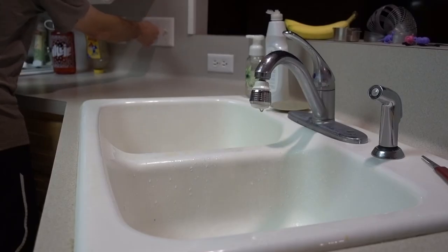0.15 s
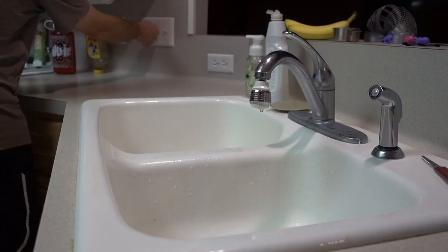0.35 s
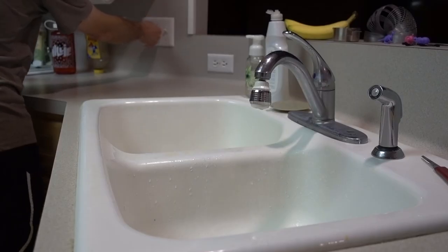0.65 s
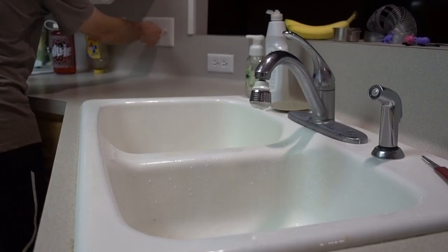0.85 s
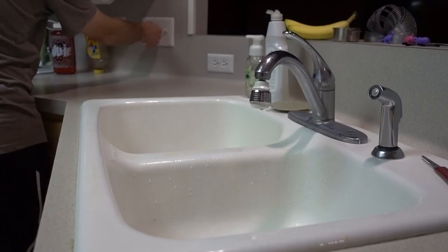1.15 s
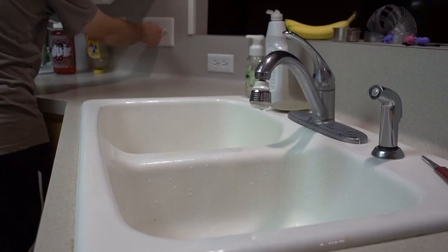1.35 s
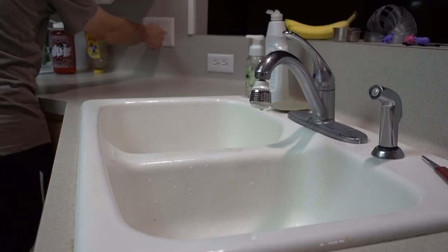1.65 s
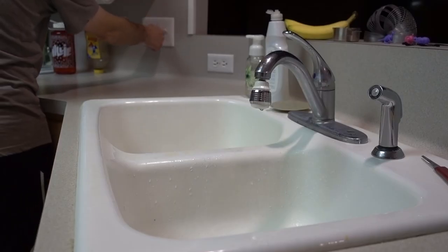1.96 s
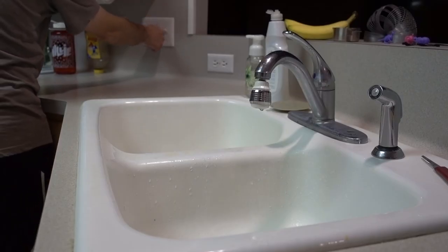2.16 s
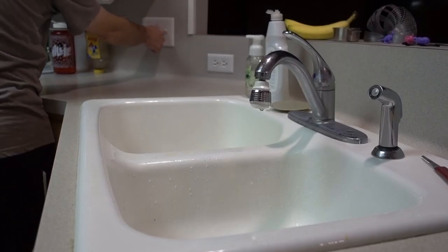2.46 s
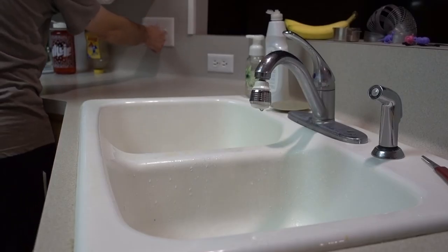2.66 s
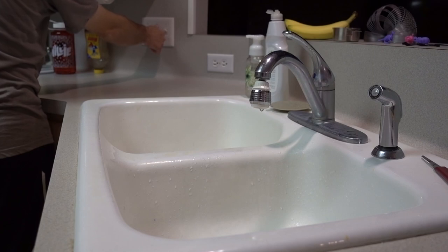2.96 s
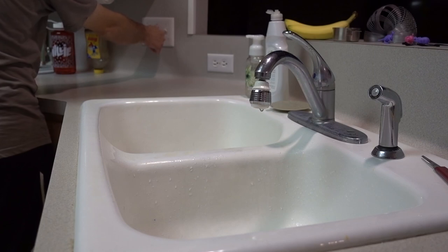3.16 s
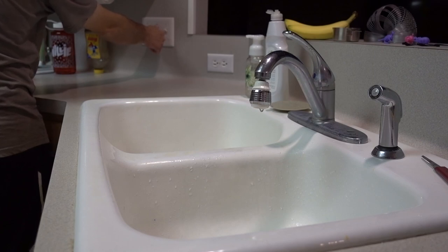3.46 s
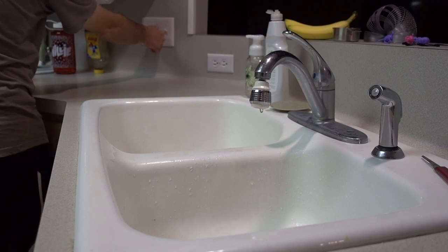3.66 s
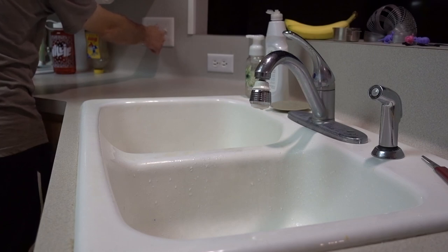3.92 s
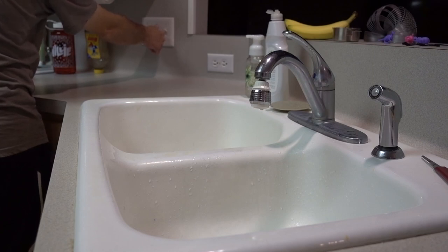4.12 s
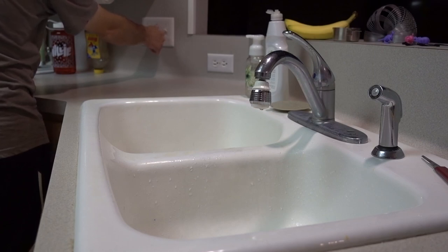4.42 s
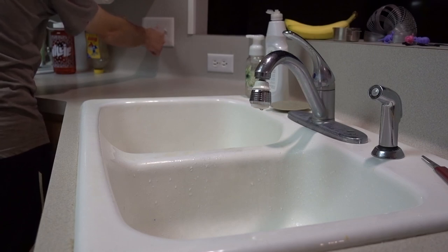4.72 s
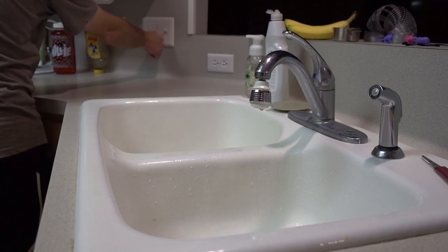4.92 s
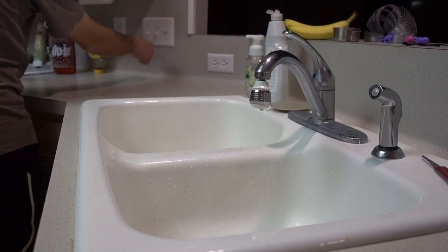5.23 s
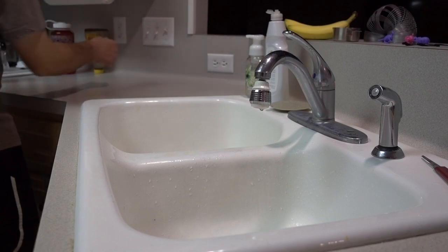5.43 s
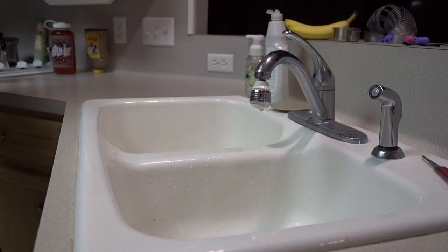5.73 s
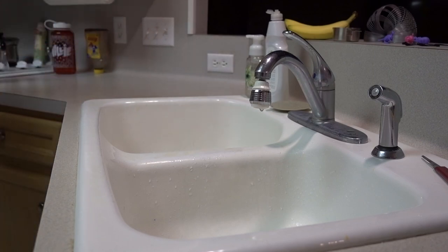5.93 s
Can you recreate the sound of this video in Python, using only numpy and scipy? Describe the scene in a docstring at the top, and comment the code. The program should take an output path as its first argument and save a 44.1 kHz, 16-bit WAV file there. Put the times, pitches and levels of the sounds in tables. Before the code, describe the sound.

Quiet kitchen, switch snap, then an under-sink grinder lurches to life, humming, ringing and spitting water for several seconds before being switched off.

```python
"""First a quiet kitchen, then the click of a wall switch: a waste disposer under the sink starts with a jolt
and a squeal, runs almost empty, and is switched off to coast down. Air and water whirl in the grind chamber,
modelled as noise through resonances that sing through the drain mouth. Loose lugs rattle the steel plate (pulsed
noise through its modes), slugs of water spit at the wall (noise bursts), air pockets gulp (rising tones), and
the motor hums through the cabinet (sines tied to mains and shaft, over low noise)."""
import sys
import numpy as np
from scipy import signal
from scipy.fft import rfft, irfft, next_fast_len
from scipy.io import wavfile
from scipy.ndimage import uniform_filter1d

SR = 44100
rng = np.random.default_rng(int(sys.argv[2]) if len(sys.argv) > 2 else 0)


def wrap_up_sound(samples):
    """Save the sound to the file named by the first command line argument, as 16-bit audio."""
    columns = np.atleast_2d(samples).T
    # keep every value between -1 and 1, then stretch to whole-number steps
    tamed = np.clip(columns, -1, 1)
    steps = np.round(tamed * 32767).astype(np.int16)
    wavfile.write(sys.argv[1], SR, steps)


N = 268304
# frequency bins in Hz, padded so that rings can die
HZ = np.maximum(np.fft.rfftfreq(next_fast_len(N + SR // 2, True) // 2 * 2, 1 / SR), 1)

# Kitchen air: [f/Hz, relative density/dB per Hz]
AIR_COLOUR = [(12, -59), (20, -27), (86, -10), (99, -28), (118, -0.5), (151, -3), (406, -16), (431, -17),
              (477, -10.5), (528, -14), (2500, -29.5), (3250, -75), (5500, -120)]
# Microphone hiss: [f/Hz, relative density/dB per Hz]
HISS_COLOUR = [(1800, -30), (2500, 0), (3700, -7), (5300, -13), (8000, -18), (16000, -22)]
AIR_DB, HISS_DB = -57, -76

# Likeness of the two ears: [f/Hz, left-right likeness 0-1]
EAR_LIKENESS = [(60, .999), (350, .997), (900, .975), (1000, .96), (1100, .89), (2000, .87), (3000, .85),
                (6000, .67), (9500, .42), (13000, .74), (16000, .85)]
# Stereo lean: [f/Hz, left minus right level/dB]
EAR_LEAN = [(500, 0), (900, -.8), (990, -1.4), (1060, -3), (1500, -2.5), (2000, -.5), (3000, .5),
            (6000, 1.1), (10000, .7), (14000, -.2)]
# Bands cancelled by echoes in the basin: [f/Hz, width/Hz, depth 0-1]
BASIN_NOTCHES = [(404.5, 68, 0.76), (653, 38, 0.65), (885, 110, 0.83), (1047, 19, 0.45), (1981, 43, 1),
                 (2517, 180, 1), (3970, 280, 0.7)]
WALLS_T60_S, WALLS_DB = 0.76, -10  # tail level before its bass is cut

# Wall switch snapping over: [t/s, strike level/dB]
SWITCH_SNAPS = [(0.4715, -24.5), (5.1625, -27.5)]
# Ring of the switch and its plate: [f/Hz, level/dB, t60/s]
SWITCH_MODES = [(800, -8, .035), (1400, -1, .04), (1900, -7, .025), (2200, -4, .028), (4700, -12, .012)]

# Motor through the cabinet: [t/s, rumble level/dB, drive of the tones/dB]
MOTOR_LEVELS = [(0.47, -86, -60), (0.5, -42.5, -40), (0.62, -46, -1), (0.8, -53.5, 2), (3, -54, 0.5),
                (5.15, -50.5, -2), (5.25, -51, -5.5), (5.6, -54.5, -8), (6.08, -64, -31)]
# Shaft tones: [multiple of the shaft rate, mean level/dB at 0 dB drive]
SHAFT_ORDERS = [(6, -61.5), (8, -63.5), (10, -54.5), (11, -52.5), (62, -57), (63, -50.5), (64, -58)]
# Shaft speed: [t/s, turns per s]
SHAFT_SPEED = [(0.47, 7), (0.5, 18), (0.62, 27), (0.75, 29.66), (5.16, 29.66), (5.6, 28), (6.08, 24.5)]
# Colour of the cabinet and pipes: [f/Hz, relative density/dB per Hz]
RUMBLE_COLOUR = [(12, -57), (20, -16), (70, -3.5), (129, 1.5), (226, 0), (307, 11), (337, 7.5), (406, -51),
                 (519, -39), (570, 7), (655, -38), (741, -51), (800, 5), (1040, -78), (1760, -120)]
# Magnetic hum at twice the mains: [t/s, level/dB rms of its steady tone]
HUM_LEVELS = [(0.48, -60), (0.62, -52), (0.75, -55.5), (2, -56), (3.5, -55), (5.15, -55.5), (5.2, -75)]
# Starting jolt of the motor in its mount: [t/s, level/dB rms]
JOLT_LEVELS = [(0.48, -74), (0.516, -63), (0.576, -48.5), (0.618, -55), (0.668, -43), (0.766, -73),
               (0.79, -75), (0.85, -68)]
# Resonance of that mount: [f/Hz, width/Hz]
JOLT_MODE = (68, 25)
HUM_HZ, SIDE_TONE_DB = 120, -1  # side tone: one shaft rate above the hum, so that it wavers once a turn
# the shaft's fourth order lags the hum and beats with it
SLIP_BEAT_HZ, IN_STEP_S, FOURTH_ORDER_DB = 1.37, 1.29, -4.5

# Air pockets gulping in the water: [t/s, peak level/dB, nominal f/Hz, t60/s]
GULPS = [(1.2835, -24.5, 1400, 0.1), (1.508, -23.5, 1545, 0.12), (1.9445, -34, 1420, 0.061),
         (2.043, -24, 1293, 0.16), (2.58, -19, 1372, 0.093), (2.807, -17.5, 1500, 0.058),
         (2.8973, -27, 1500, 0.087), (3.7098, -30, 1514, 0.065), (3.916, -18.5, 1394, 0.057),
         (4.0264, -15.5, 1395, 0.052), (4.4507, -31, 1313, 0.13), (4.622, -33, 1510, 0.057),
         (5.4404, -37, 1230, 0.057), (5.655, -34, 1430, 0.074), (6.0442, -36, 1325, 0.12)]

# Slugs of water thrown at the wall: [t/s, bright peak level/dB, body level/dB, top level/dB,
# plate ring level/dB, t60/s]
SPITS = [(0.5102, -36, -45, -44, -49, 0.13), (0.5656, -34, -38.5, -47, -36.5, 0.33),
         (0.6863, -27, -47, -31.5, -33, 0.11), (0.7746, -21, -34, -47, -30.5, 0.073),
         (0.902, -29, -39, -39, -41, 0.079), (0.9323, -29, -58, -51, -42, 0.074),
         (0.9536, -41, -54, -54, -40, 0.077), (1.0036, -44, -41, -50, -35, 0.2),
         (1.0909, -21.5, -33, -34, -36.5, 0.095), (1.191, -39, -40.5, -43, -40, 0.22),
         (1.2615, -30, -37, -30.5, -36.5, 0.14), (1.2994, -39, -43, -39, -46, 0.13),
         (1.491, -32, -41, -40, -28.5, 0.11), (1.579, -33, -50, -40, -30, 0.092),
         (1.6397, -28, -41, -36, -39, 0.088), (1.7379, -34, -43, -53, -47, 0.11),
         (1.8334, -19, -31, -27, -33.5, 0.082), (1.92, -21.5, -35, -46, -38, 0.064),
         (1.948, -22.5, -36, -31, -35, 0.064), (2.032, -38, -37, -48, -40.5, 0.24),
         (2.145, -25.5, -48, -49, -44, 0.31), (2.2548, -30, -37, -41, -50, 0.16),
         (2.369, -28.5, -42, -42, -38, 0.25), (2.4564, -37, -53, -37, -47, 0.069),
         (2.5324, -29, -46, -41, -35, 0.074), (2.581, -30, -41, -45, -38.5, 0.13),
         (2.658, -27, -36, -48, -45.5, 0.1), (2.7132, -29.5, -39.5, -39, -57, 0.25),
         (2.809, -27, -32, -38, -40, 0.062), (2.897, -31, -33.5, -44, -40, 0.12),
         (2.9804, -40, -55, -53, -37.5, 0.1), (3.0455, -45, -49, -43, -46, 0.11),
         (3.1467, -29, -44, -37, -43, 0.1), (3.2046, -40, -37, -53, -51, 0.07),
         (3.267, -47, -39, -53, -41.5, 0.14), (3.3164, -42, -45, -54, -34, 0.047),
         (3.3708, -32, -39, -53, -43, 0.11), (3.4266, -40, -45, -49, -48, 0.33),
         (3.5, -23, -45, -41, -40, 0.1), (3.556, -29, -37.5, -41, -43, 0.13),
         (3.6381, -25, -36, -48, -30, 0.074), (3.717, -18, -35, -30, -39, 0.095),
         (3.7868, -36, -42, -46, -36, 0.054), (3.8422, -32, -42, -53, -39, 0.1),
         (3.919, -28, -37.5, -45, -42, 0.11), (3.9524, -43, -46, -53, -41, 0.1),
         (4.0287, -36, -33, -41, -41, 0.087), (4.0976, -34, -42, -42, -50, 0.16),
         (4.209, -24, -37, -43, -39, 0.095), (4.3695, -32, -39, -58, -37, 0.068),
         (4.546, -46, -47, -55, -37, 0.072), (4.58, -43, -59, -45, -46, 0.079),
         (4.628, -24.5, -34, -32, -40, 0.11), (4.7042, -27, -39, -44, -50, 0.092),
         (4.7381, -35, -43.5, -41, -45.5, 0.26), (4.837, -35, -37.5, -43, -45, 0.11),
         (4.8703, -30, -35.5, -38, -48, 0.085), (4.9167, -19.5, -35.5, -39, -39.5, 0.16),
         (4.9766, -34, -43.5, -48, -65, 0.23), (5.248, -28.5, -45, -45, -48, 0.1),
         (5.387, -40, -44, -45, -46, 0.13), (5.445, -24, -35, -48, -35, 0.082),
         (5.5531, -34, -50, -64, -47.5, 0.17), (5.6044, -39, -46, -57, -57, 0.11),
         (5.655, -33, -44, -50, -41.5, 0.078), (5.6979, -47, -43, -47, -56, 0.11),
         (5.7743, -41, -38, -48, -38, 0.086), (5.8466, -43, -43.5, -46, -58, 0.093),
         (5.9105, -40, -45.5, -61, -55, 0.11), (5.9994, -26.5, -38, -45, -42, 0.08),
         (6.044, -39, -47, -61, -54, 0.088)]
SPIT_RISE_S, BODY_THUMP_DB = 0.0054, 7  # the body part also thumps the chamber
PLATE_OUTLASTS = 1.32  # the plate rings this many times longer than the hiss
LULL_DB, LULL_T60_S = -4.5, 0.23  # thinning while a slug gathers: depth, and how fast it deepens
NOISE_CREST_DB = 9  # peak of a noise burst over its rms

# Whirl between surges: [t/s, drain-mouth tone level/dB, upper resonances level/dB, plate ring level/dB,
# spray level/dB]
WHIRL_LEVELS = [(0.49, -72, -45, -88, -76), (0.66, -41, -41.5, -62, -46), (0.77, -32, -46.5, -51, -44),
                (1.08, -28, -43.5, -50.5, -42), (1.41, -36.5, -42, -50, -50.5),
                (1.64, -37.5, -46, -56, -43.5), (2.01, -35, -45.5, -56.5, -44),
                (2.54, -30.5, -37, -43, -44), (2.81, -29, -48, -51.5, -47.5), (3.2, -31, -39, -41, -46),
                (3.5, -35.5, -57, -55, -45), (3.73, -34.5, -47, -60, -44), (4.01, -31, -46, -57, -45),
                (4.38, -32.5, -44.5, -52, -47), (4.76, -34, -48.5, -52, -45), (4.94, -30, -60, -58, -48),
                (5.15, -43.5, -49.5, -56.5, -49.5), (6.08, -41, -54.5, -69, -54.5)]
# Colour of the spray: [f/Hz, relative density/dB per Hz]
SPRAY_COLOUR = [(1180, -52), (2000, -21), (2140, -20), (2550, -53), (2810, 16), (3980, -11), (5390, 4),
                (6250, -49), (6760, 5.5), (15100, 2), (16000, 10)]
# Steel plate modes: [f/Hz]
PLATE_HZ = [2884, 3300, 3745, 4200, 4316, 4700, 5150, 5634, 5754, 5950, 6132, 6255, 6378, 6955, 7530, 8410]
# Shape of each plate mode: [width/Hz, level/dB]
PLATE_SHAPE = [(193, -9), (197, -14.5), (28, 2.5), (24.4, 1), (25.7, 2.5), (120, -10), (35, -9), (35, -3),
               (34.8, -12), (40, -13), (44.7, 6.5), (40.3, -3.5), (50, 4.5), (40, -7.5), (252, -8.5),
               (208, -10.5)]
PLATE = [(hz, *shape) for hz, shape in zip(PLATE_HZ, PLATE_SHAPE)]

# Start: plate squealing as it breaks free while standing water churns: [t/s, squeal level/dB, churn level/dB]
START_LEVELS = [(0.49, -93, -34), (0.506, -39, -36.5), (0.564, -48.5, -29.5), (0.602, -48, -33.5),
                (0.648, -60, -39), (0.68, -63, -37)]
# Squeal resonances: [f/Hz, width/Hz, level/dB]
SQUEAL_MODES = [(10570, 200, -2), (8900, 64, -2), (8100, 130, -4), (5700, 71, -2), (4640, 110, -19)]
# Churn resonances: [f/Hz, width/Hz, level/dB]
CHURN_MODES = [(491, 38, 4), (603, 26, 6), (774, 110, 5.5), (1147, 120, 12.5), (1420, 510, -2),
               (4600, 390, -10), (8200, 1200, -39)]
# A lug scraping the ring: [t/s, level/dB, t60/s]
SCRAPES = [(2.14, -23, 0.37)]
# Scrape resonances: [f/Hz, width/Hz, level/dB]
SCRAPE_MODES = [(5880, 46, 7.5), (1130, 30, 14.5), (4920, 110, -14)]
SCRAPE_RISE_S = 0.0093

# Lugs knocking against their stops: [t/s, peak level/dB before the knock is coloured and heard in the room]
LUG_KNOCKS = [(0.6853, -36), (0.8015, -20), (0.9807, -40), (1.292, -16), (1.3503, -22), (1.482, -16.5),
              (2.137, -19), (2.4294, -22), (2.8809, -42), (3.1981, -22), (3.3568, -20), (3.5518, -21),
              (3.6361, -18), (3.713, -14.5), (4.201, -20), (4.3655, -22), (4.4515, -13.5), (4.6229, -21),
              (4.8589, -31), (4.913, -26)]
LUG_RISE_S, LUG_T60_S = 0.002, 0.028

# Drain-mouth resonances: [f/Hz, width/Hz, level/dB]
MOUTH_MODES = [(1002, 21.8, 7), (1074, 45.8, -1.5), (1105.7, 24, -1.5), (1199, 2.4, -7), (990, 10, -41)]
# Air and wall resonances of the chamber: [f/Hz]
CHAMBER_HZ = [310, 581, 690, 815, 861, 1290, 1345, 1512, 1750, 1838, 1895, 2014, 2300]
# Shape of each chamber resonance: [width/Hz, level/dB]
CHAMBER_SHAPE = [(37.7, -4), (24.2, -2.5), (37.8, -18.5), (27, -14.5), (27, 4.5), (60, -10), (43, -1.5),
                 (22.8, -1), (52.3, -3), (25, -1), (49.7, 2), (25.3, -1), (50, -16.5)]
CHAMBER = [(hz, *shape) for hz, shape in zip(CHAMBER_HZ, CHAMBER_SHAPE)]
# Water clearing the drain mouth at a stroke, so the tone jumps up: [t/s, nominal peak level/dB, t60/s]
MOUTH_KNOCKS = [(0.5057, -29.5, 0.19), (0.5751, -23, 0.16), (0.595, -18.5, 0.15), (0.6255, -34, 0.15),
                (0.689, -17, 0.15), (0.7382, -21, 0.36), (0.8056, -24, 0.15), (0.8785, -13, 0.1),
                (0.9224, -18, 0.1), (0.952, -19, 0.086), (1.005, -21, 0.16), (1.037, -21, 0.24),
                (1.095, -27, 0.19), (1.1303, -32, 0.12), (1.204, -24.5, 0.35), (1.259, -20.5, 0.19),
                (1.3483, -13.5, 0.11), (1.493, -14.5, 0.2), (1.5315, -19, 0.33), (1.5893, -17, 0.26),
                (1.694, -26, 0.092), (1.7345, -18.5, 0.081), (1.774, -20.5, 0.094), (1.8986, -20.5, 0.19),
                (1.9445, -24, 0.31), (2.0023, -24, 0.26), (2.03, -23.5, 0.27), (2.1316, -9, 0.078),
                (2.251, -21, 0.15), (2.284, -21.5, 0.13), (2.3456, -24, 0.18), (2.3895, -22.5, 0.34),
                (2.4713, -20.5, 0.26), (2.524, -18, 0.12), (2.5705, -17, 0.17), (2.594, -20, 0.17),
                (2.6285, -20, 0.22), (2.6569, -26, 0.19), (2.6975, -19, 0.15), (2.7244, -24, 0.1),
                (2.803, -17, 0.21), (2.8389, -35, 0.11), (2.8862, -20.5, 0.4), (2.941, -15, 0.15),
                (2.992, -21, 0.16), (3.026, -18.5, 0.34), (3.0464, -38, 0.19), (3.081, -21, 0.26),
                (3.1308, -20, 0.11), (3.241, -15.5, 0.2), (3.2814, -20.5, 0.21), (3.3125, -20, 0.26),
                (3.373, -21.5, 0.24), (3.425, -25, 0.2), (3.48, -18.5, 0.13), (3.501, -17.5, 0.11),
                (3.556, -15, 0.074), (3.638, -15, 0.12), (3.786, -25, 0.16), (3.8845, -23, 0.24),
                (3.9215, -28, 0.17), (3.952, -18, 0.11), (4.029, -21.5, 0.15), (4.111, -29, 0.27),
                (4.343, -20.5, 0.17), (4.3889, -34, 0.1), (4.4373, -25, 0.11), (4.4922, -26, 0.37),
                (4.563, -25, 0.15), (4.595, -25, 0.23), (4.6574, -17, 0.2), (4.703, -22, 0.15),
                (4.7381, -31, 0.17), (4.834, -48, 0.17), (4.895, -17.5, 0.098), (4.978, -20, 0.31),
                (5.0499, -32, 0.11), (5.1163, -15, 0.08), (5.246, -18.5, 0.1), (5.3842, -28, 0.32),
                (5.4385, -18, 0.087), (5.5655, -26.5, 0.11), (5.6032, -22, 0.1), (5.654, -28, 0.085),
                (5.735, -24.5, 0.11), (6.003, -33, 0.075), (6.0506, -20, 0.058)]
KNOCK_RISE_S, UPPER_FOLLOWS_DB = 0.0036, -17  # upper resonances follow each jump at this level
SMALL_KNOCKS_PER_S, SMALL_KNOCK_DB, SMALL_T60_S = 14, 1.5, 0.07  # random jumps, relative to the steady tone
SHUT_DB, SHUT_T60_S = 0, 0.14  # before each knock the film closes over the mouth: depth, and how fast

ROUNDING_TOP, CUTOFF_HZ = .24, 15900  # peaks are rounded towards this height


def amp(db):
    """Decibels to gain."""
    return 10 ** (np.asarray(db) / 20)


def rms_one(x):
    """Scale to unit rms."""
    return x / np.sqrt(np.mean(x ** 2) + 1e-20)


def in_time(rows, before=-140):
    """Curve columns at every sample: 'before' outside the span, but held at the end if it reaches 6 s."""
    s, *columns = np.transpose(rows)
    t = np.arange(N) / SR
    return [np.interp(t, s, c, left=before, right=before if s[-1] < 6 else c[-1]) for c in columns]


def at_hz(points):
    """A table over log frequency read at every bin."""
    hz, value = np.transpose(points)
    return np.interp(np.log(HZ), np.log(hz), value)


def drift(rate):
    """Slow chance with unit spread, faster for a higher rate in Hz."""
    r = np.exp(-80 * np.pi * rate / SR)  # one step is 40 samples
    noise = rng.standard_normal(N // 40 + 4002)
    slow = signal.lfilter([1], [1, -2 * r, r * r], noise)[4000:]
    return np.interp(np.arange(N) / 40, np.arange(len(slow)), rms_one(slow - slow.mean()))


def resonances(modes):
    """Response of parallel resonances with alternating signs."""
    return sum((-1) ** k * amp(db) * 1j * HZ * width / (hz ** 2 - HZ ** 2 + 1j * HZ * width)
               for k, (hz, width, db) in enumerate(modes))


def to_ears(response, mid, side):
    """Colour a centre and a diffuse signal and mix them for the two microphones."""
    mid, side = rfft([mid, side], 2 * len(HZ) - 2) * response
    alike = np.clip(at_hz(EAR_LIKENESS), 0, 1)
    lean = amp(at_hz(EAR_LEAN) / 2)
    mid = mid * np.sqrt((1 + alike) / 2)
    side = side * np.sqrt((1 - alike) / 2)
    return irfft([(mid + side) * lean, (mid - side) / lean])[:, :N]


def stereo_noise(response, drive):
    """Noise pulsed by drive and coloured by response; unit rms for a steady drive of one."""
    unit_response = response / np.sqrt(np.mean(np.abs(response) ** 2))
    mid, side = rng.standard_normal((2, N)) * drive
    return to_ears(unit_response, mid, side)


def bursts(times, levels_db, t60s, rise_s):
    """An envelope of quick rises with exponential falls, each starting one rise time early."""
    out, t = np.zeros(N + SR), np.arange(SR // 2) / SR
    for s, db, t60 in np.broadcast(times, levels_db, t60s):
        i = round((s - rise_s) * SR)
        out[i:i + len(t)] += (1 - np.exp(-t / rise_s)) * amp(db - 60 * t / max(t60, .02))
    return out[:N]


def closing(times, depth_db, t60, release_s):
    """A gain that sinks ahead of each event and recovers fast: bursts turned round in time."""
    return 1 / (1 + bursts(N / SR - times, depth_db, t60, release_s)[::-1])


def background():
    """Steady coloured noise for the kitchen air and the microphone hiss."""
    air = stereo_noise(amp(at_hz(AIR_COLOUR)), amp(AIR_DB))
    return air + stereo_noise(amp(at_hz(HISS_COLOUR)), amp(HISS_DB))


def kitchen(x):
    """Echoes in the basin cancel a few bands; the tiled walls add a short tail without bass."""
    t = np.arange(SR // 3) / SR
    tail = rng.standard_normal(len(t)) * amp(-60 * t / WALLS_T60_S) * (t > .004)
    tail_response = rfft(tail / np.linalg.norm(tail), 2 * len(HZ) - 2)
    walls = amp(WALLS_DB) * tail_response / (1 + (500 / HZ) ** 2)
    basin = np.prod([1 - np.clip(depth, 0, 1) * resonances([(hz, width, 0)])
                     for hz, width, depth in BASIN_NOTCHES], axis=0)
    return irfft(rfft(x, 2 * len(HZ) - 2) * basin * (1 + walls))[:, :N]


def switch():
    """The toggle lands twice, 1.4 ms apart, and rings with its plate; the tiles give a brief tail."""
    clicks = np.zeros(N)
    for s, db in SWITCH_SNAPS:
        clicks[round(s * SR)] = .4 * amp(db)
        clicks[round((s + .0014) * SR)] = amp(db)
    soft = signal.lfilter([.3], [1, -.7], clicks + 1e-18)  # plastic contact
    ring = np.zeros(N)
    for hz, db, t60 in SWITCH_MODES:
        r, w = amp(-60 / (t60 * SR)), 2 * np.pi * hz / SR
        ring += signal.lfilter([0, amp(db) * np.sin(w)], [1, -2 * r * np.cos(w), r * r], soft)
    crack = signal.lfilter([.07], [1, -amp(-60 / (.052 * SR))], clicks + 1e-18)
    tail = signal.lfilter([.12], [1, -amp(-60 / (.25 * SR))], clicks + 1e-18)
    crack_colour = HZ / (HZ + 3000)
    tail_colour = 1 / (1 + (HZ / 2500) ** 4) / (1 + (400 / HZ) ** 2)
    return ring + stereo_noise(crack_colour, crack) + stereo_noise(tail_colour, tail)


def mains_hum(turns, drive_db):
    """Magnetic pull at twice the mains, with a lagging tone that beats and a side tone that wavers."""
    t = np.arange(N) / SR
    steady = np.sin(2 * np.pi * HUM_HZ * t)
    lagging_turns = HUM_HZ * t - SLIP_BEAT_HZ * (t - IN_STEP_S)
    lagging = amp(FOURTH_ORDER_DB + drive_db) * np.sin(2 * np.pi * lagging_turns)
    above = amp(SIDE_TONE_DB + 2.0 * drift(2.3)) * np.sin(2 * np.pi * (HUM_HZ * t + turns))
    return np.sqrt(2) * amp(in_time(HUM_LEVELS)[0]) * (steady + lagging + above)


def shaft_tones(turns, drive_db):
    """Tones at multiples of the shaft rate, wandering a little in level and phase."""
    wobble_turns = .0015
    tones = sum(np.sqrt(2) * amp(db + 2.5 * drift(4.7))
                * np.sin(2 * np.pi * k * (turns + wobble_turns * drift(4.7))) for k, db in SHAFT_ORDERS)
    return amp(drive_db) * tones


def motor(turns):
    """Hum and shaft tones pass through the cabinet with the mount's starting jolt and a low rumble."""
    rumble_db, drive_db = in_time(MOTOR_LEVELS)
    jolt = stereo_noise(resonances([(*JOLT_MODE, 0)]), amp(in_time(JOLT_LEVELS)[0]))
    rumble = stereo_noise(amp(at_hz(RUMBLE_COLOUR)), amp(rumble_db))
    return mains_hum(turns, drive_db) + shaft_tones(turns, drive_db) + jolt + rumble


def gulps():
    """A pocket rings as a dying tone that climbs as it nears the surface."""
    out = np.zeros(N)
    for s, db, hz, t60 in GULPS:
        i = round((s - .004) * SR)
        t = np.arange(min(N - i, SR // 4)) / SR
        shape = (1 - np.exp(-t / 0.0039)) * amp(db - 60 * t / max(t60, .02))
        out[i:i + len(t)] += shape * np.sin(2 * np.pi * hz * t * (.97 + 1.7 * t))
    return to_ears(0.84, out, out)


def band(low_hz, high_hz):
    """A smooth band between two corners."""
    return 1 / (1 + (low_hz / HZ) ** 5) / (1 + (HZ / high_hz) ** 5)


def spits():
    """Each slug is a ragged hiss that rises in a few ms and dies; its duller part also thumps the chamber."""
    s, peak_db, body_db, top_db, _, t60 = np.transpose(SPITS)
    body = bursts(s, body_db, t60, SPIT_RISE_S)
    bright = bursts(s, peak_db - NOISE_CREST_DB, t60, SPIT_RISE_S)
    top = bursts(s, top_db, t60, SPIT_RISE_S)
    ragged = amp(0.53 * drift(140) + 1.1 * drift(450))  # single drops
    hiss = (stereo_noise(band(low_hz=2330, high_hz=4130), body * ragged)
            + stereo_noise(band(low_hz=6150, high_hz=10300), bright * ragged)
            + stereo_noise(band(low_hz=11800, high_hz=15500), top * ragged))
    return hiss + stereo_noise(resonances(CHAMBER), amp(BODY_THUMP_DB) * body)


def spray_and_churn(lull):
    """Fine spray crackles around the plate; at the start, standing water churns through resonances."""
    spray_db = in_time(WHIRL_LEVELS)[3]
    churn_db = in_time(START_LEVELS)[1]
    drops = amp(0.5 * drift(2.5) + 2.5 * drift(130))
    spray = stereo_noise(amp(at_hz(SPRAY_COLOUR)), amp(spray_db) * lull * drops)
    return spray + stereo_noise(resonances(CHURN_MODES), amp(churn_db) * drops)


def squeal_and_scrape():
    """The plate squeals as it breaks free, and a lug later scrapes the ring: noise through narrow modes."""
    squeal = stereo_noise(resonances(SQUEAL_MODES), amp(in_time(START_LEVELS)[0]))
    return squeal + stereo_noise(resonances(SCRAPE_MODES), bursts(*np.transpose(SCRAPES), SCRAPE_RISE_S))


def plate_rattle(lull):
    """Lug contacts ring the steel plate, harder under each slug; its modes flicker in three interleaved groups."""
    plate_db = in_time(WHIRL_LEVELS)[2]
    s, _, _, _, struck_db, t60 = np.transpose(SPITS)
    contact = amp(plate_db) * lull + bursts(s, struck_db, PLATE_OUTLASTS * t60, SPIT_RISE_S)
    mode_group_responses = [resonances(PLATE[k::3]) for k in range(3)]
    powers = [np.mean(np.abs(response) ** 2) for response in mode_group_responses]
    plate = 0
    for response, power in zip(mode_group_responses, powers):
        uneven = amp(4.05 * drift(25.3) + 2.9 * drift(190))
        plate = plate + np.sqrt(power / sum(powers)) * stereo_noise(response, contact * uneven)
    return plate


def rattle():
    """Plate, spray, churn, squeal and scrape; plate and spray thin out while a slug gathers."""
    lull = closing(np.transpose(SPITS)[0], LULL_DB, LULL_T60_S, SPIT_RISE_S)
    return plate_rattle(lull) + spray_and_churn(lull) + squeal_and_scrape()


def lug_knocks():
    """A lug hitting its stop gives a short burst of mid-band noise."""
    s, peak_db = np.transpose(LUG_KNOCKS)
    thumps = bursts(s, peak_db - NOISE_CREST_DB, LUG_T60_S, LUG_RISE_S)
    knock_colour = 1 / (1 + (1200 / HZ) ** 4) / (1 + (HZ / 3000) ** 4)
    return stereo_noise(knock_colour, thumps)


def mouth_song():
    """Turbulence drives the mouth resonances; the jet at the lip holds the air column's swing fairly even."""
    song = stereo_noise(resonances(MOUTH_MODES), 0.66)
    swing = np.sqrt(uniform_filter1d(np.mean(song ** 2, axis=0), size=SR // 70) + 0.014)
    return song / swing ** 0.75


def small_knocks():
    """Random small jumps of the mouth tone, with exponential waits between them."""
    waits = -np.log(1 - rng.random(300)) / SMALL_KNOCKS_PER_S
    s = .1 + np.cumsum(waits)
    return bursts(s[s < N / SR], SMALL_KNOCK_DB, SMALL_T60_S, KNOCK_RISE_S)


def whirl(turns):
    """Turbulence keeps the air resonances singing; the water film opens and shuts the mouth they sound through."""
    mouth_db, upper_db = in_time(WHIRL_LEVELS)[:2]
    s, peak_db, t60 = np.transpose(MOUTH_KNOCKS)
    jumps = bursts(s, peak_db, t60, KNOCK_RISE_S) / np.sqrt(2)  # peak of a tone to rms
    jumps = jumps + amp(mouth_db) * small_knocks()
    shut = closing(s, SHUT_DB, SHUT_T60_S, KNOCK_RISE_S)
    mouth = (amp(mouth_db) + jumps) * shut * mouth_song()
    passing = 1 + 0.95 * np.cos(2 * np.pi * turns)  # lugs sweep the outlet every turn
    gusts = amp(1.2 * drift(15))
    upper_drive = amp(upper_db) * passing * gusts + amp(UPPER_FOLLOWS_DB) * jumps
    return mouth + stereo_noise(resonances(CHAMBER), upper_drive * np.sqrt(shut))


def scene():
    """Everything heard at the sink; the chamber sounds pass through basin and room."""
    turns = np.cumsum(in_time(SHAFT_SPEED, before=0)[0]) / SR
    chamber = gulps() + spits() + rattle() + lug_knocks() + whirl(turns)
    return background() + switch() + motor(turns) + kitchen(chamber)


def record(dry):
    """The input stage rounds peaks gently; the top is cut steeply."""
    rounded = ROUNDING_TOP * np.tanh(dry / ROUNDING_TOP)
    top_cut = signal.cheby2(26, 100, CUTOFF_HZ + 300, fs=SR, output="sos")
    return signal.sosfilt(top_cut, rounded)


dry = scene()
out = record(dry)
wrap_up_sound(out)
```